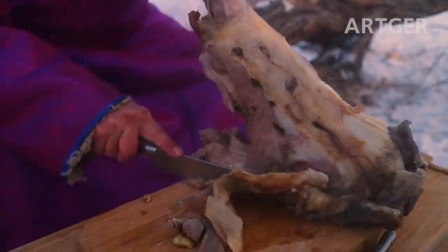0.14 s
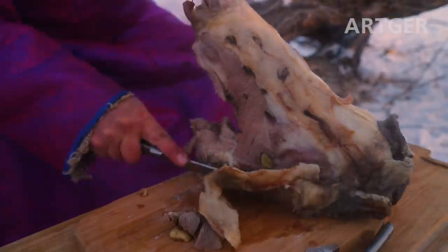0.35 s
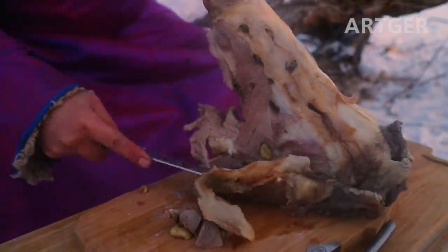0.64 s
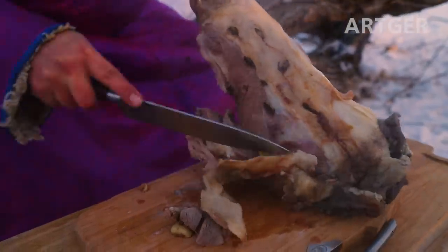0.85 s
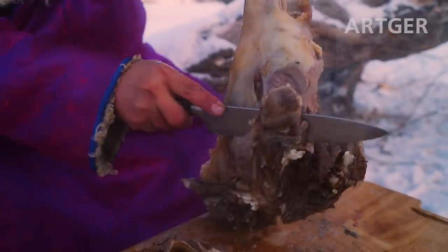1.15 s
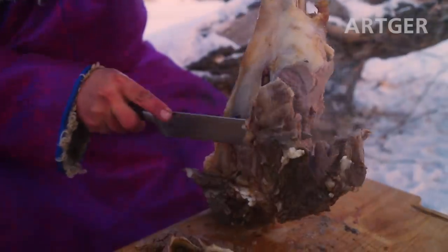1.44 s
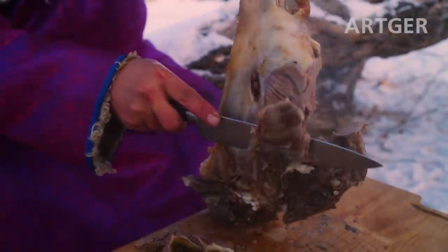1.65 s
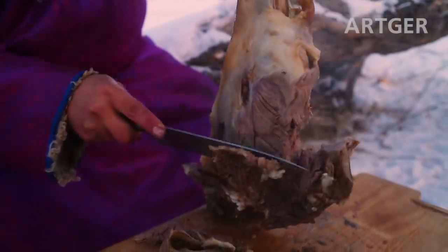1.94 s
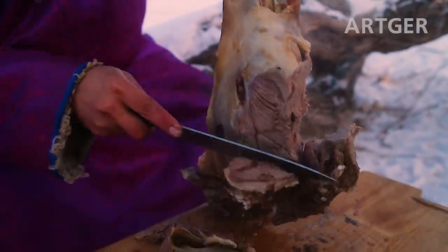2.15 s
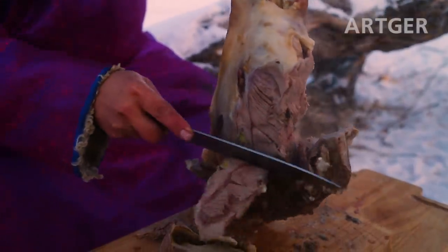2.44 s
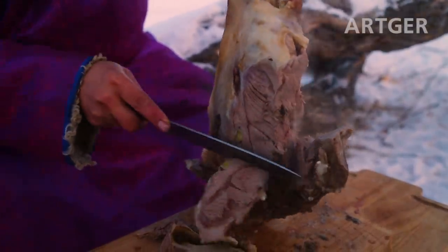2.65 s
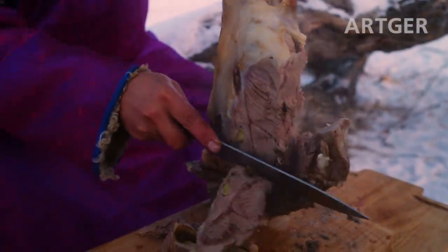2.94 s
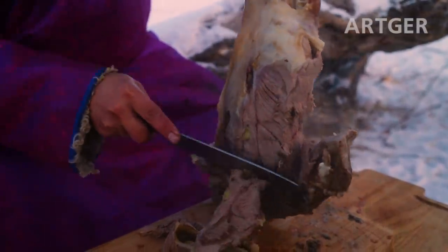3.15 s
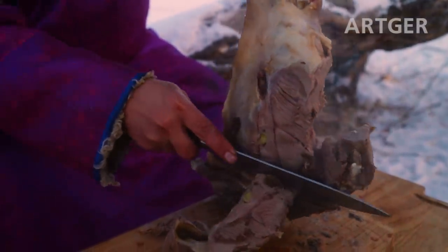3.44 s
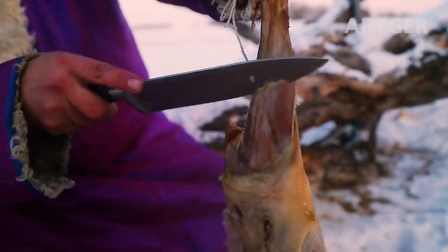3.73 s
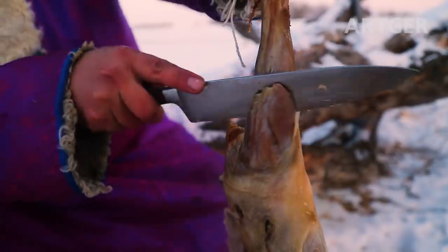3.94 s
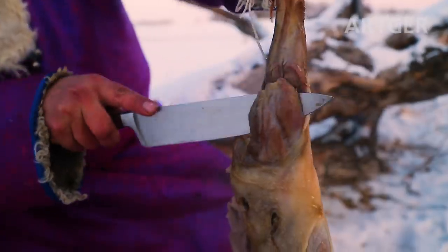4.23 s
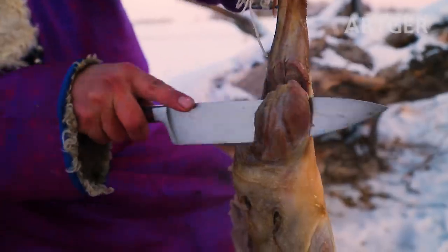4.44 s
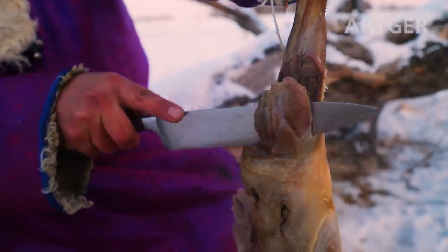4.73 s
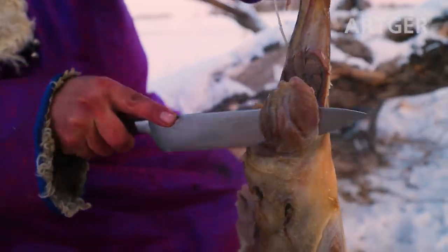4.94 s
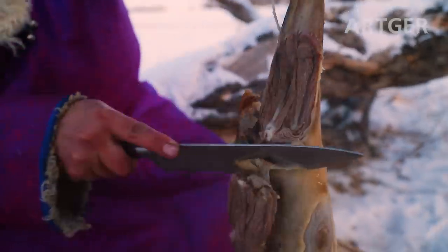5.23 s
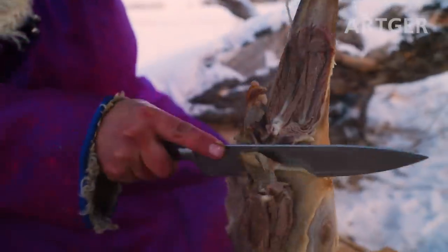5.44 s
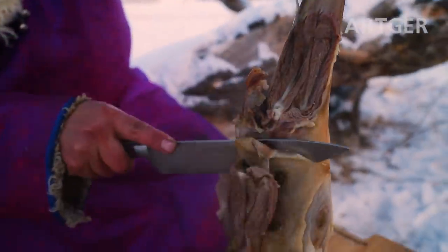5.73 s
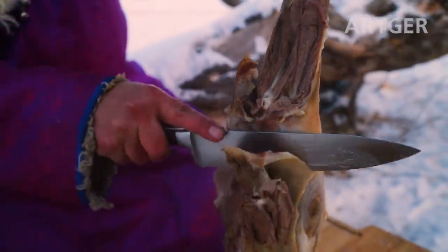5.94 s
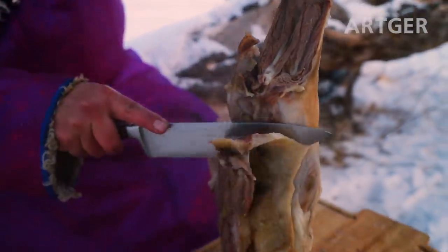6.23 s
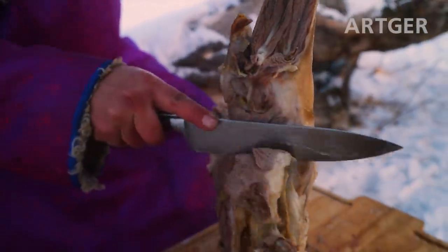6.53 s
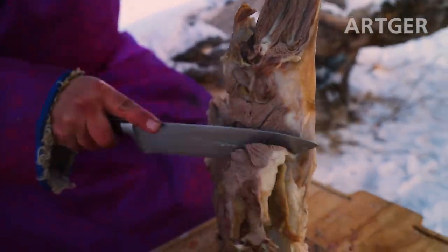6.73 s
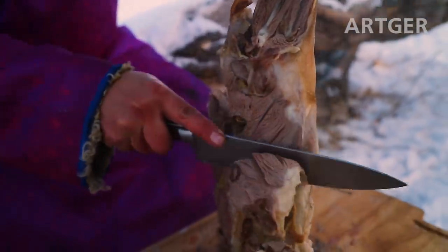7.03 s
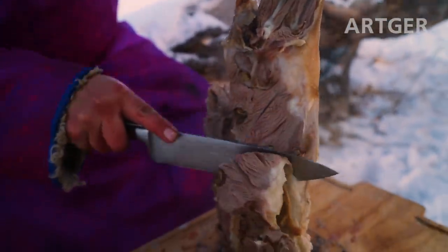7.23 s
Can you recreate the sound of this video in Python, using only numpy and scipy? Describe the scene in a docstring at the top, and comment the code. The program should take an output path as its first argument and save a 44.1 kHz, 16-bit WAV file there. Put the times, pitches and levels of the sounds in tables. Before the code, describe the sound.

Outdoors, with a light rumble of air on the microphone, a knife carves moist meat close by in steady back-and-forth strokes, hissy and finely crackling. It opens with a short scrape on bone, then goes on with wet clicks, faint squeaks, further scrapes and a few dull knocks on a wooden board. Twice a distant magpie gives a quick run of harsh notes, echoing slightly among trees.

```python
"""Outdoors in the cold, a kitchen knife saws cooked meat off a big bone on a wooden board, close by.
From the start each stroke hisses and crackles as fibres part, and light air rumbles on the microphone.
Wet meat ticks, a piece thuds on the board, the blade rasps on bone and squeaks on meat; all recur.
Some way off a magpie chatters at 1.2 s and again at 4.4 s. The sawing goes on to the end at 7.4 s."""
import sys
import numpy as np
from scipy import signal
from scipy.fft import rfft, irfft, next_fast_len
from scipy.io import wavfile
from scipy.ndimage import map_coordinates

SR = 44100
rng = np.random.default_rng(int(sys.argv[2]) if len(sys.argv) > 2 else 0)


def master(y):
    """Save y as 16-bit WAV."""
    cut = np.clip(np.atleast_2d(y).T, -1, 1)
    pcm = np.round(cut * 32767)  # scale
    wavfile.write(sys.argv[1], SR, pcm.astype(np.int16))


N = 325030

# Each row: start, speed-up and slow-down in seconds, then hiss, fibre, flesh and fizz levels in dB.
SAW_STROKES = [(-0.09, .2, .13, -49.5, -49, -49.5, -70), (0.255, .065, .14, -54, -51.5, -50, -57),
               (0.39, 0.11, .22, -57, -54, -53.5, -69), (0.649, 0.18, 0.095, -59.5, -53, -53, -72),
               (1.001, 0.025, 0.22, -50.5, -54, -52, -62), (1.24, .11, 0.29, -52.5, -55.5, -58, -69),
               (1.539, 0.14, 0.16, -50, -48.5, -54, -57), (1.86, .04, 0.3, -54, -55, -56, -71),
               (2.111, 0.16, 0.14, -49, -53.5, -56, -63), (2.44, 0.18, 0.1, -53.5, -53.5, -52, -64),
               (2.713, .18, 0.12, -47.5, -50.5, -51, -62), (3.022, 0.11, 0.13, -50, -55, -53, -64),
               (3.256, 0.11, 0.24, -53, -54, -55, -59), (3.636, 0.047, 0.11, -52.5, -57, -54, -57.5),
               (3.756, 0.17, .11, -50, -54.5, -59, -53.5), (4.01, 0.11, 0.099, -60.5, -56, -58.5, -68),
               (4.15, 0.088, 0.078, -54, -64, -70, -69), (4.385, 0.13, 0.31, -51.5, -49, -56, -67),
               (4.715, .1, 0.15, -56, -48.5, -67, -50.5), (4.96, 0.2, .16, -53.5, -56.5, -53.5, -60),
               (5.296, 0.12, 0.11, -46, -49.5, -53.5, -54), (5.509, 0.12, 0.19, -54, -57, -53.5, -76),
               (5.828, 0.14, 0.11, -44, -50.5, -55, -53), (6.087, 0.14, 0.09, -51.5, -54.5, -56, -66),
               (6.347, 0.13, 0.12, -44, -51.5, -53, -59), (6.609, 0.16, .115, -48.5, -59.5, -56.5, -53.5),
               (6.88, .15, 0.15, -45, -50, -53, -62), (7.179, 0.092, .14, -51.5, -54.5, -54, -62)]
# One value each for hiss, fibres, flesh and fizz.
SPEED_EXPONENTS = [0.91, 0.58, 0.71, 0.5]
TURN_FLOOR_DB = [-65.5, -67, -60.5, -80]
BITE_DB_SHARES = [1.0, 1.0, 0.73, 1]
# Tough strands. Each row: centre in seconds, half width in seconds, boost in dB.
STRAND_BITES = [(1.69, 0.0089, 0.5), (2.851, 0.0042, 6), (3.416, 0.013, 9), (3.677, 0.0066, 2),
                (3.793, .005, 6), (3.938, .005, 8), (3.971, 0.02, 6), (4.521, 0.0056, 3), (5.325, 0.014, 7),
                (5.388, 0.0094, 1), (6.006, 0.0163, 1), (6.476, 0.029, 4), (7.052, 0.0098, 2.5),
                (7.29, 0.01, 2.5)]
# Spectra. Each row: frequency in Hz, relative level in dB.
HISS_SPECTRUM = [(2000, -23.5), (5000, -12.5), (7000, -7.5), (8700, -1), (10300, 1.5), (12500, -5),
                 (16000, -13)]
FIBRE_SPECTRUM = [(300, -23.5), (900, -18.5), (1800, -2.5), (3100, 0), (4500, -2.5), (6500, -5.5),
                  (10000, -5), (16000, -45)]
FLESH_SPECTRUM = [(40, 8.5), (110, 4), (160, -6.5), (300, 1.5), (550, 0.5), (900, 0), (1600, -5.5),
                  (3500, -8.5), (9000, -46)]
FIZZ_SPECTRUM = [(4000, -3), (8000, -38), (11000, 2.5), (13000, -0.5), (16000, -4)]
RUMBLE_SPECTRUM = [(2, -21), (5.5, -5), (8.5, 16.5), (13, 15), (36, 1.5), (55, -7.5), (80, -10.5),
                   (140, -28.5), (300, -44), (1000, -45)]
HUSH_SPECTRUM = [(59, -14), (100, 1), (150, 9), (322, 3), (2630, -13.5), (6560, -7.5), (9820, -10),
                 (16000, -11)]
THROAT_SPECTRUM = [(500, -71), (950, -17), (1180, -7.5), (1550, -4.5), (1850, 3.5), (2200, -1.5),
                   (2500, -4), (2850, -2), (3200, -21.5), (3800, -18), (5300, -16.5), (6500, -20),
                   (7600, -65), (12000, -60)]
# Air on the microphone. Each row: time in seconds, relative level in dB.
AIR_LEVELS = [(0.0, -57.5), (1.54, -59.5), (1.76, -54), (2.91, -55), (3.26, -56.5), (3.53, -62),
              (3.88, -53), (5.15, -54), (5.23, -56.5), (7.37, -57.5)]
# Each row: start in seconds, peak in dB, centre in Hz, Q, T60 in seconds.
WET_TICKS = [(0.012, -21.5, 5500, 0.67, 0.0036), (0.183, -22.5, 2460, 0.27, 0.0078),
             (0.457, -33, 2970, 2.8, 0.011), (0.558, -35, 4740, 2.2, 0.012), (0.757, -30, 5250, 6.6, .004),
             (0.839, -34, 5640, 7.7, .004), (0.992, -36, 10600, 4.7, .003), (1.116, -28, 9100, 8.9, 0.0023),
             (1.898, -24, 9530, 3.8, 0.0016), (2.263, -32, 3450, 4, .0045),
             (2.4344, -28.5, 6000, 0.29, 0.026), (2.525, -28.5, 9100, 17, .004),
             (2.884, -30, 8300, 1.7, .0046), (2.889, -26, 10000, 2.8, .003),
             (2.902, -24, 10200, 10, 0.0077), (2.993, -30, 4900, 1.4, 0.0055),
             (3.38, -27, 10200, 15, .0034), (3.408, -35, 5000, 0.83, 0.0049), (3.503, -36, 9300, 2.1, .005),
             (3.526, -32, 6400, 2.2, 0.0034), (3.662, -29, 8950, 2.7, .004),
             (3.791, -38.5, 4370, 0.2, .008), (3.9348, -24, 7660, 0.91, 0.0094),
             (3.97, -22.5, 7900, 1.9, 0.0026), (4.037, -32, 6500, 1.5, .014),
             (4.126, -30.5, 5800, 1.6, 0.026), (4.204, -29, 11500, 5, .002),
             (4.331, -38, 8000, 0.65, 0.018), (4.446, -21, 11000, 3, .002), (4.47, -26, 8300, 1.8, .0023),
             (4.522, -22, 8350, 2, 0.0048), (4.62, -24, 5300, 5.3, .0045),
             (4.633, -22.5, 7460, 2.2, 0.0046), (4.836, -37.5, 10200, 6.3, .003),
             (5.094, -29, 6250, 0.33, 0.0073), (5.238, -32, 9000, 6.2, 0.003),
             (5.318, -41, 3740, 1.3, 0.012), (5.389, -18.5, 6800, 0.44, .0035),
             (5.598, -24, 4020, 3.5, .008), (6.008, -19.5, 7650, 1.4, 0.004), (6.095, -28, 9400, 9, 0.0024),
             (6.406, -22.5, 8340, 1.9, .002), (6.572, -26, 11900, 5.1, 0.0056),
             (6.632, -24, 9800, 2.6, 0.0036), (6.77, -27.5, 11000, 6.7, .0024),
             (6.9, -26.5, 10300, 9.7, 0.0093), (6.957, -25, 10100, 9.7, .003),
             (7.051, -23, 7500, 1.2, 0.0027), (7.093, -22.5, 9100, 2.3, 0.0064)]
# Each row: start in seconds, peak in dB, contact time in seconds.
BOARD_THUDS = [(0.02, -34, 0.012), (0.747, -43, .008), (1.537, -36, 0.03), (2.322, -28, 0.03),
               (2.384, -34, 0.049), (3.237, -43, 0.022), (6.2448, -28.5, 0.00049), (6.255, -29, 0.00045),
               (6.401, -40.5, 0.0099), (7.34, -43, 0.007)]
# Each row: frequency in Hz, relative level in dB, T60 in seconds.
BOARD_MODES = [(56.5, -8.5, 0.088), (90, -3, 0.038), (143, -3.5, 0.028), (205, -0.5, 0.031),
               (308, 1.5, 0.014), (540, -4, 0.023), (730, -6, 0.011)]
# Each row: hardest press, build-up and release in seconds, level in dB.
BONE_RASPS = [(0.18, 0.17, 0.037, -40), (0.345, 0.1, .055, -41.5), (2.961, 0.22, 0.038, -52.5),
              (3.14, 0.099, 0.1, -60), (3.42, 0.025, 0.059, -48), (5.328, 0.024, 0.041, -44.5)]
# Blade on bone. Each row: frequency in Hz, Q, relative level in dB.
BONE_MODES = [(654, 3.6, 3), (1200, 2.8, 15.5), (2110, 6.68, 3.5), (3160, 5.5, -40), (4260, 32, -51)]
# Each row: centre in seconds, level in dB, pitch in Hz, half-height length in seconds.
MEAT_SQUEAKS = [(0.193, -45, 1980, .048), (0.299, -46.5, 2200, 0.062), (0.459, -47.5, 2320, 0.027),
                (0.487, -49, 4070, 0.012), (0.495, -50, 1620, 0.032), (0.619, -49, 2340, 0.057),
                (0.707, -47.5, 2580, 0.035), (2.748, -55, 3190, 0.019), (2.959, -45.5, 3040, 0.028),
                (3.411, -44, 3070, 0.03), (3.938, -45.5, 1820, 0.011), (4.089, -50.5, 3620, .028),
                (5.605, -42.5, 2590, 0.0082), (5.697, -46.5, 2600, 0.0075), (6.063, -50, 1990, .014),
                (6.695, -51, 1650, 0.017)]
# Each row: centre in seconds, level in dB, half-height length in seconds, pitch ratio.
MAGPIE_NOTES = [(1.187, -40.5, .03, 1.08), (1.265, -39, .048, 1.105), (1.339, -38, 0.04, 1.085),
                (1.417, -39, 0.051, 1.09), (1.511, -37.5, .044, 1.09), (1.61, -37.5, .047, 1.02),
                (1.727, -37.5, .046, 1), (4.41, -41.5, 0.042, 1.09), (4.477, -43.5, 0.054, 1.0),
                (4.563, -42, 0.042, 1.01), (4.647, -39.5, .038, 1.1), (4.757, -40.5, .054, 1.015),
                (4.867, -40.5, .05, .97)]
# Echo of the trees. Each row: frequency in Hz, T60 in seconds.
TREE_DECAY = [(300, 0.14), (2000, 0.6), (7000, 0.92)]


def amp(db):
    """Decibels to gain."""
    return 10 ** (np.asarray(db) / 20)


def unit(x):
    """Scale to rms 1."""
    return x / np.sqrt(np.mean(x ** 2) + 1e-20)


def along(points, hz):
    """Read (Hz, value) points on a log axis."""
    knots_hz, values = np.transpose(points)
    return np.interp(np.log(hz + 1), np.log(knots_hz + 1), values)


def wobble(rate_hz):
    """Smooth random curve through rate_hz knots a second."""
    knots = rng.standard_normal(int(N * rate_hz / SR) + 4)
    return map_coordinates(knots, [np.arange(N) * rate_hz / SR])


def filtered(x, response):
    """Apply a frequency response."""
    n = x.shape[-1]
    size = next_fast_len(n + 8192)
    return irfft(rfft(x, size) * response(np.fft.rfftfreq(size, 1 / SR)), size)[..., :n]


def coloured(x, spectrum):
    """Shape x by a spectrum, at rms 1."""
    return unit(filtered(x, lambda hz: amp(along(spectrum, hz))))


def resonance(hz, centre_hz, q):
    """Causal response of one damped resonance."""
    damping = 1j * hz * centre_hz / q
    return damping / (centre_hz ** 2 - hz ** 2 + damping)


def add(track, start_s, sound):
    """Mix a sound into a track."""
    start = max(round(start_s * SR), 0)
    part = track[..., start:start + sound.shape[-1]]
    part += sound[..., :part.shape[-1]]


def spread(pair, width):
    """Mid and side to left and right; width is the side-to-mid gain."""
    mid, side = pair
    return np.array([mid + width * side, mid - width * side]) / np.sqrt(1 + width ** 2)


def placed(x, right_db, lag_ms):
    """Pan by the right channel's level and lag against the left."""
    side = np.array([[-.5], [.5]])
    return filtered(x, lambda hz: amp(side * right_db) * np.exp(-2j * np.pi * hz * side * lag_ms / 1000))


def crackle(rate_hz, friction, width):
    """Tiny uneven ruptures over smooth friction noise, in stereo."""
    grains = unit(rng.standard_normal((2, N)) * (rng.random((2, N)) < rate_hz / SR))
    return spread(unit(grains + friction * rng.standard_normal((2, N))), width)


def swell(length_s):
    """Smooth rise and fall, length_s wide at half height."""
    return np.hanning(max(int(2 * length_s * SR), 8))


def patchy(x, depth_db, bands, frames):
    """Brief random resonances come and go; rms 1."""
    spectra = signal.stft(x, nperseg=256)[2]
    patch = np.outer(np.hanning(bands), np.hanning(frames))
    field = unit(signal.fftconvolve(rng.standard_normal(spectra.shape[-2:]), patch, "same"))
    return unit(signal.istft(spectra * amp(depth_db * field), nperseg=256)[1][..., :x.shape[-1]])


def stroke_levels_db():
    """Hiss, fibres, flesh and fizz follow blade speed and swell at tough strands."""
    t = np.arange(N) / SR
    power = np.ones(N) * amp(TURN_FLOOR_DB)[:, None] ** 2
    for start_s, rise_s, fall_s, *levels_db in SAW_STROKES:
        end_s = start_s + rise_s + fall_s
        during = (t > start_s) & (t < end_s)
        speed = np.sin(np.interp(t[during], [start_s, start_s + rise_s, end_s], [0, np.pi / 2, np.pi]))
        power[:, during] += (amp(levels_db)[:, None] * speed ** np.array(SPEED_EXPONENTS)[:, None]) ** 2
    bite_db = sum(db * np.exp(-((t - at_s) / half_s) ** 2) for at_s, half_s, db in STRAND_BITES)
    return 10 * np.log10(power) + np.outer(BITE_DB_SHARES, bite_db)


def sawing():
    """The blade slides and parts fibres, more per second in a harder stroke; juice films burst."""
    hiss_db, fibre_db, flesh_db, fizz_db = stroke_levels_db()
    effort = amp(hiss_db - np.mean(hiss_db))
    edge_catch_db, toughness_db = 1.66 * wobble(150), wobble(22)
    hiss = coloured(crackle(1200 * effort, friction=0.84, width=0.57), HISS_SPECTRUM)
    fibres = coloured(crackle(900 * effort, friction=1.45, width=0.29), FIBRE_SPECTRUM)
    flesh = coloured(crackle(600 * effort, friction=1.46, width=0.33), FLESH_SPECTRUM)
    fizz = coloured(crackle(700 * effort, friction=0.39, width=0.56), FIZZ_SPECTRUM)
    # wet pockets open and close in the cut
    hiss, fibres, fizz = (patchy(x, depth_db=2.5, bands=8, frames=15) for x in (hiss, fibres, fizz))
    grip = amp(edge_catch_db + toughness_db)
    edge = grip * (amp(hiss_db) * hiss + amp(fibre_db) * fibres)
    juice = grip * amp(fizz_db) * fizz
    drag = amp(flesh_db + 0.52 * wobble(40)) * flesh
    return (placed(edge, right_db=0.7, lag_ms=0.0075)
            + placed(juice, right_db=6, lag_ms=0.009)
            + placed(drag, right_db=0.9, lag_ms=0.0056))


def air(rumble_gain_db=18.5, hush_db=-61):
    """Light air buffets the two microphone ports in opposition, over a faint steady hush."""
    level_db = np.interp(np.arange(N) / SR, *np.transpose(AIR_LEVELS))
    gusts = amp(level_db + rumble_gain_db + 0.5 * wobble(18))
    rumble = coloured(spread(rng.standard_normal((2, N)), width=3.17), RUMBLE_SPECTRUM)
    hush = coloured(spread(rng.standard_normal((2, N)), width=0.85), HUSH_SPECTRUM)
    return placed(gusts * rumble, right_db=1, lag_ms=0) + amp(hush_db) * hush


def small_tick_rows(per_stroke=3, over_hiss_db=12, centre_hz=9200, q=4.9, t60_s=0.0015):
    """Faint chance snaps, louder in a hard stroke; rows as in WET_TICKS."""
    rows = []
    for start_s, rise_s, fall_s, hiss_db, *_ in np.repeat(SAW_STROKES, per_stroke, axis=0):
        at_s = start_s + rng.beta(2, 2) * (rise_s + fall_s)
        peak_db = hiss_db + over_hiss_db + rng.normal(0, 2.5)
        octaves = rng.normal(0, 0.4)
        rows.append((at_s, peak_db, centre_hz * 2 ** octaves, q, t60_s))
    return rows


def ticks():
    """Each snapping fibre is a short spatter ringing in a small wet pocket."""
    track, t = np.zeros((2, N)), np.arange(SR // 30) / SR
    for start_s, peak_db, centre_hz, q, t60_s in WET_TICKS + small_tick_rows():
        burst = spread(rng.standard_normal((2, len(t))), width=0.39) * amp(-60 * t / t60_s)
        snap = filtered(burst, lambda hz: resonance(hz, centre_hz, q) * resonance(hz, centre_hz, q=0.3))
        add(track, start_s, amp(peak_db) * snap / np.abs(snap).max())
    return placed(track, right_db=2.5, lag_ms=0.0073)


def thuds(slap_db=-6.5, slap_hz=650, slap_t60_s=0.027):
    """Meat and bone hit the board with a wet slap; long soft contact excites only the low modes."""
    track, t = np.zeros(N), np.arange(SR // 6) / SR
    for start_s, peak_db, contact_s in BOARD_THUDS:
        ring = sum((-1) ** k * amp(db + rng.normal(0, 1) - 60 * t / t60_s) * np.sin(2 * np.pi * hz * t)
                   for k, (hz, db, t60_s) in enumerate(BOARD_MODES))
        splash = filtered(rng.standard_normal(len(t)), lambda hz: resonance(hz, slap_hz, q=0.9) ** 2)
        slap = amp(slap_db - 60 * t / slap_t60_s) * unit(splash)
        knock = filtered(ring + slap, lambda hz: 1 / (1 + 1j * hz * contact_s) ** 3)
        add(track, start_s, amp(peak_db) * knock / np.abs(knock).max())
    return placed(track, right_db=-4, lag_ms=0.02)


def rasp(range_db=22.5):
    """The edge judders on bone as the hand presses and lets go; slips excite hollow resonances."""
    pressure, t = np.zeros(N), np.arange(N) / SR
    for press_s, build_s, release_s, db in BONE_RASPS:
        away = np.maximum((press_s - t) / build_s, (t - press_s) / release_s)
        pressure += amp(db - range_db * away ** 2)
    slips = crackle(1000, friction=1, width=0.17)
    bone = lambda hz: sum(amp(db) * resonance(hz, mode_hz, q) for mode_hz, q, db in BONE_MODES)
    return placed(pressure * unit(filtered(slips, bone)), right_db=1, lag_ms=0.0077)


def squeaks():
    """Moist meat sticks and slips on steel in a narrow, unsteady band."""
    track = np.zeros((2, N))
    for centre_s, db, pitch_hz, length_s in MEAT_SQUEAKS:
        envelope = swell(length_s)
        slips = spread(rng.standard_normal((2, len(envelope))), width=0.32)
        band = unit(filtered(slips, lambda hz: resonance(hz, pitch_hz, q=2.9) ** 2))
        add(track, centre_s - length_s, amp(db) * envelope * band)
    return placed(track, right_db=3, lag_ms=0.015)


def magpie_note(length_s, pitch_ratio, pulse_hz=310, jitter=0.2, rough_db=1.8, turbulence=0.55):
    """Irregular syrinx pulses and rushing air ring in the throat and leave by the opening beak."""
    opening = swell(length_s)
    n = len(opening)
    periods = np.exp(jitter * rng.standard_normal(120)) * SR / (pulse_hz * pitch_ratio)
    strengths = amp(rng.normal(0, rough_db, size=120))
    pulses = np.bincount(np.cumsum(periods).astype(int), strengths, minlength=n)[:n]
    source = unit(pulses) + turbulence * rng.standard_normal(n)
    ring_hz = (1300, 1900, 2250, 2800)
    allpass = lambda hz: np.prod([1 - 2 * resonance(hz, mode_hz, q=6) for mode_hz in ring_hz], axis=0)
    throat = lambda hz: amp(along(THROAT_SPECTRUM, hz / pitch_ratio)) * allpass(hz / pitch_ratio)
    open_beak = patchy(filtered(source, throat), depth_db=1.5, bands=5, frames=21)  # the throat shifts
    half_shut = filtered(open_beak, lambda hz: np.abs(resonance(hz, 2150 * pitch_ratio, q=0.55)))
    return unit(opening * (opening * open_beak + (1 - opening) * half_shut))


def magpie(scatter_db=-6, scatter_t60_s=0.022, echo_db=-7.5):
    """Harsh notes arrive direct, scattered by rough ground and echoed by trees."""
    voice, t = np.zeros((2, N)), np.arange(SR // 25) / SR
    for centre_s, db, length_s, pitch_ratio in MAGPIE_NOTES:
        note = magpie_note(length_s, pitch_ratio)
        scatter = unit(rng.standard_normal((2, len(t))) * amp(-60 * t / scatter_t60_s))
        paths = amp(scatter_db) * scatter / np.sqrt(len(t))
        paths[:, 0] = 1  # direct path
        add(voice, centre_s - length_s, amp(db) * signal.fftconvolve(note[None], paths, axes=1))
    echo = amp(echo_db) * tree_echo(voice.mean(0))
    return placed(voice, right_db=3.5, lag_ms=0.11) + placed(echo, right_db=1, lag_ms=0.02)


def tree_echo(x):
    """Trunks scatter a long tail, different at each ear."""
    hz, t, spectra = signal.stft(rng.standard_normal((2, SR)), SR, nperseg=256)
    decay = amp(-60 * t / along(TREE_DECAY, hz)[:, None])
    tail = signal.istft(spectra * decay, SR, nperseg=256)[1]
    return signal.fftconvolve(x[None], tail / np.linalg.norm(tail[0]), axes=1)[:, :N]


def scene():
    """Close carving, air and a distant bird."""
    return sawing() + air() + ticks() + thuds() + rasp() + squeaks() + magpie()


def record(dry):
    """Brick-wall low-pass."""
    top_hz = 16050
    return filtered(dry, lambda hz: hz < top_hz)


dry = scene()
out = record(dry)
master(out)
```